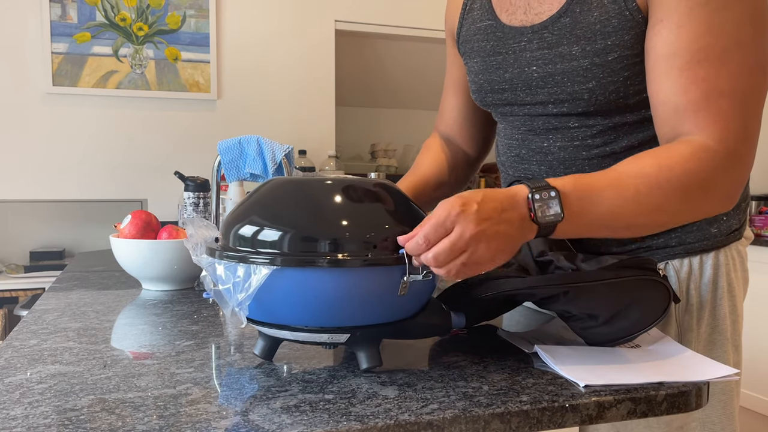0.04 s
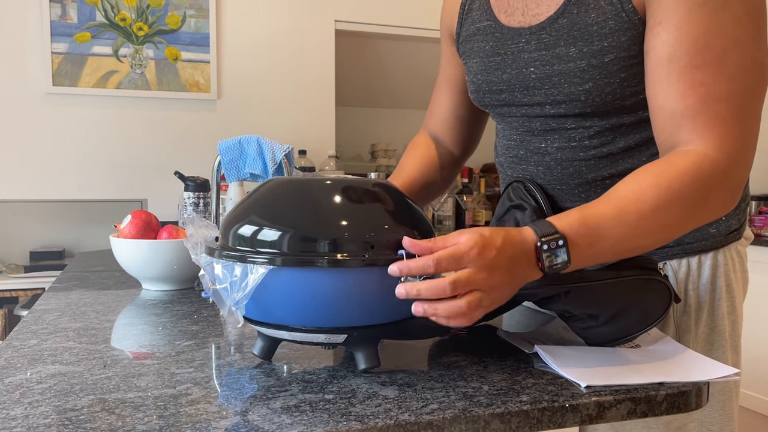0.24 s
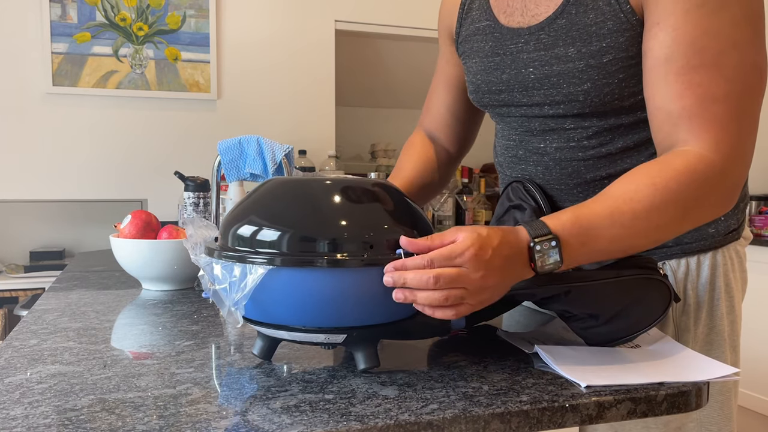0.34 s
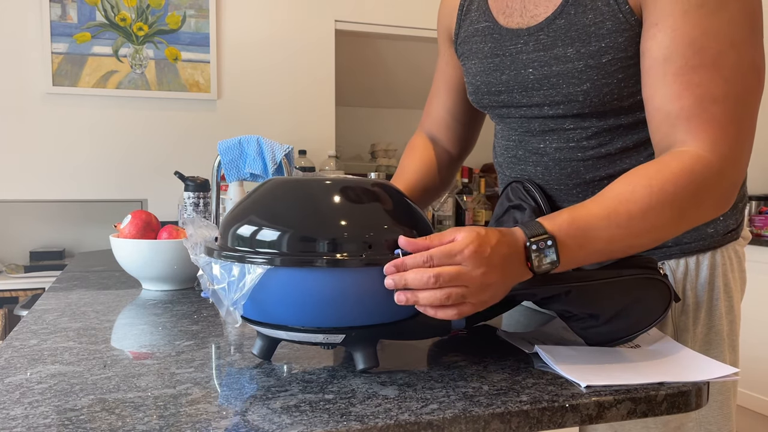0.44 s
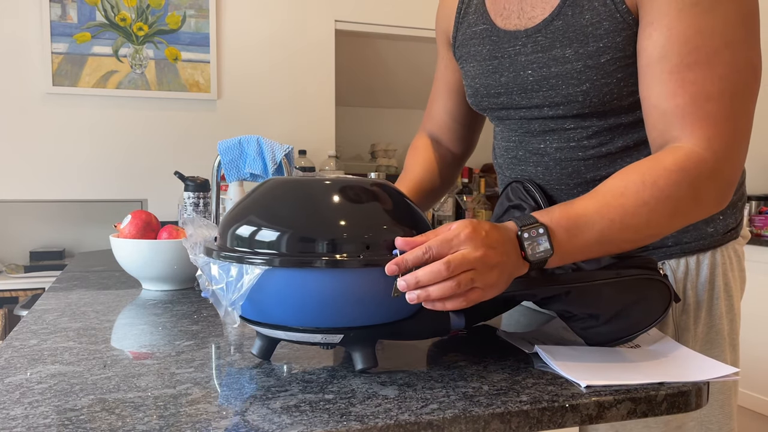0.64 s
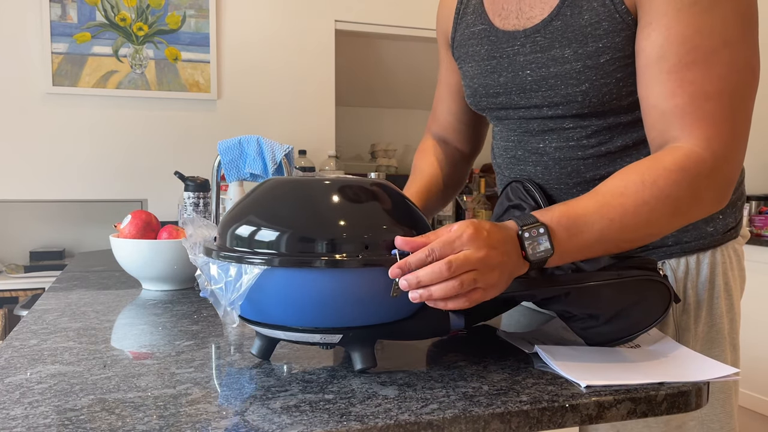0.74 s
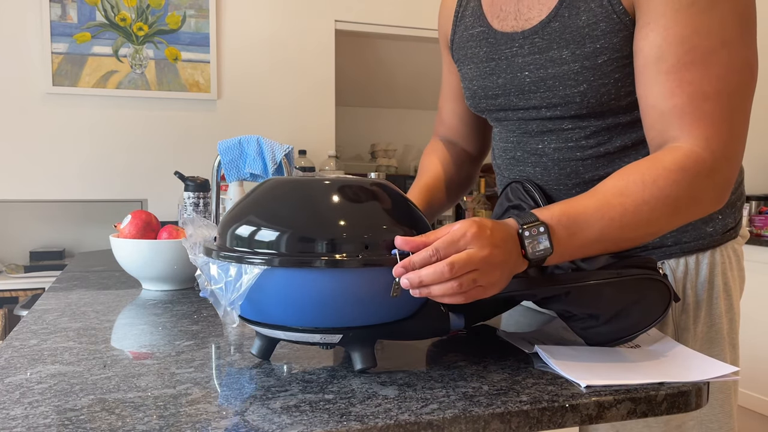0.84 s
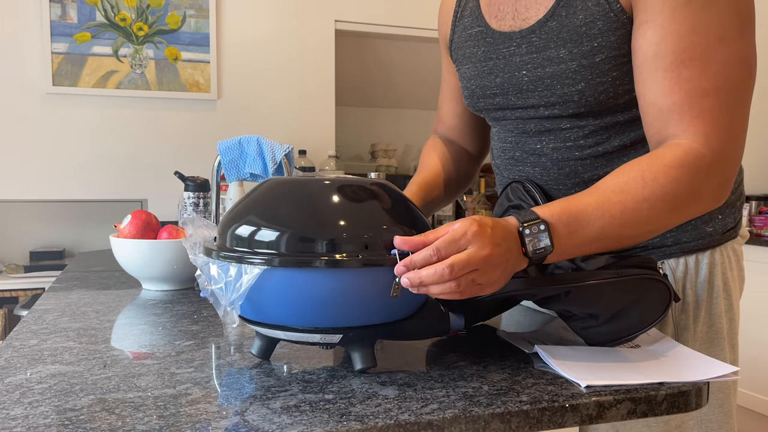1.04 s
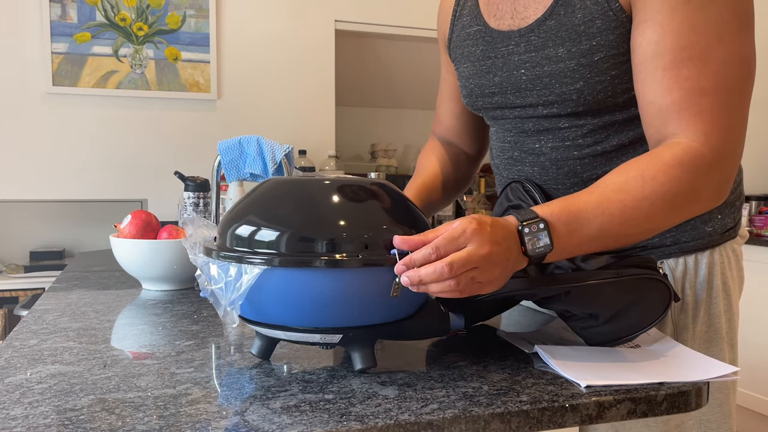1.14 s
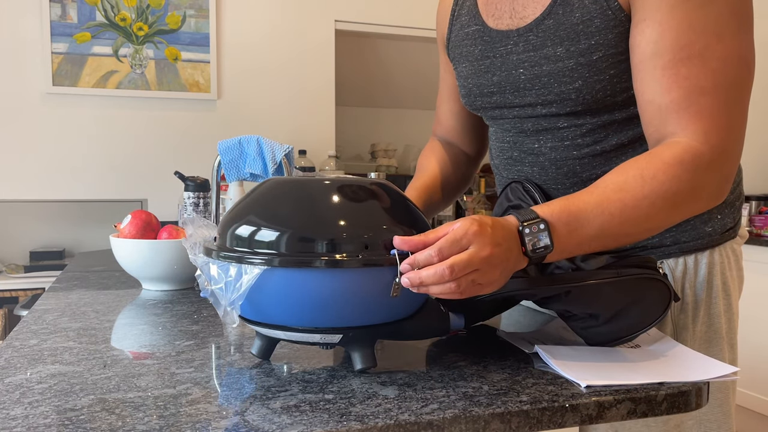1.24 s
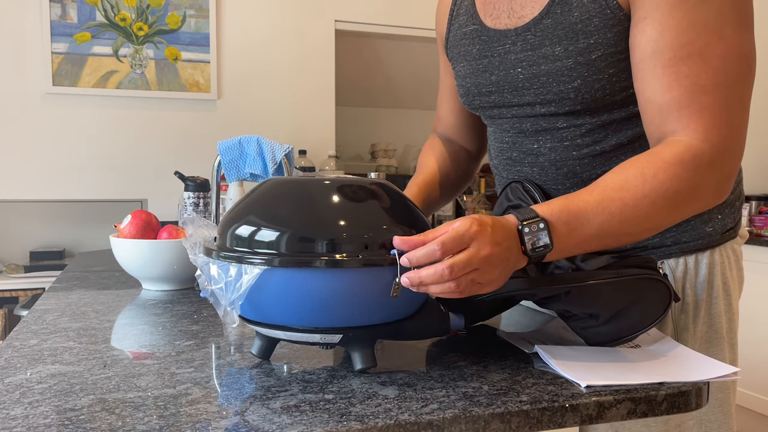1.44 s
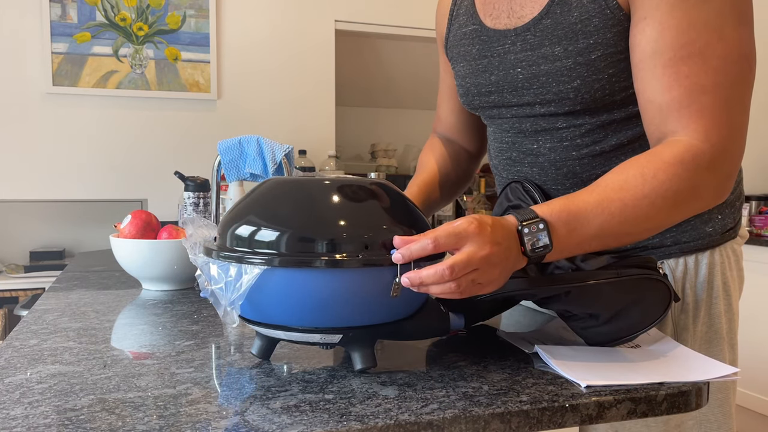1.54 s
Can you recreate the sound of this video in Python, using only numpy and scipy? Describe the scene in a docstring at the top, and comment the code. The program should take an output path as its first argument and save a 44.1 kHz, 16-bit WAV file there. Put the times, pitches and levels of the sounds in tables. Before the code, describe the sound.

A metal latch clacks and rattles on a small grill's lid in a kitchen.

```python
"""A hand works the metal latch on the domed lid of a small grill on a stone counter.
The grill bumps softly on its feet and the latch scrapes, then snaps over hard at 0.25 s.
From 0.8 s it is flipped and rattled twice more; faint ticks, scrapes and bumps close the scene.
Each contact rings the latch and the steel lid; a bare kitchen throws it back."""
import sys
import numpy as np
from scipy import signal
from scipy.fft import rfft, irfft
from scipy.io import wavfile
from scipy.ndimage import uniform_filter1d

SR = 44100
rng = np.random.default_rng(int(sys.argv[2]) if len(sys.argv) > 2 else 0)


def output_pcm(signal):
    """Save a mono or channel-first signal as 16-bit PCM at the path in sys.argv[1].

    Samples are clipped to [-1, 1] before scaling.
    """
    pcm = np.clip(np.atleast_2d(signal).T, -1, 1) * 32767
    wavfile.write(sys.argv[1], SR, np.round(pcm).astype(np.int16))


N = 70560
T = np.arange(N) / SR
HZ = np.fft.rfftfreq(2 * N, 1 / SR)


def amp(db):
    """Decibels to gain."""
    return 10 ** (np.asarray(db) / 20)


def unit(x):
    """Scale each row to unit energy."""
    return x / np.sqrt((x ** 2).sum(-1, keepdims=True) + 1e-20)


def decay(t, t60_s):
    """Exponential fall, 60 dB per t60_s."""
    return np.exp(-np.log(1000) * t / t60_s)


def curve(points, hz=HZ):
    """Interpolate (freq_hz, value) points on a log frequency axis."""
    freq_hz, value = np.transpose(points)
    return np.interp(np.log(hz + 1), np.log(freq_hz + 1), value)


def add(mix, start_s, sound):
    """Mix in a sound; start_s may be negative."""
    at = round(start_s * SR)
    sound = sound[:, max(-at, 0):]
    part = mix[:, max(at, 0):][:, :sound.shape[1]]
    part += sound[:, :part.shape[1]]


def convolve(a, b):
    """Convolve along time, cut to N samples."""
    return signal.fftconvolve(np.atleast_2d(a), np.atleast_2d(b), axes=1)[:, :N]


def colour(x, points, size=4096):
    """Minimum-phase filter from (freq_hz, gain_db) points."""
    log_gain = np.log(amp(curve(points, abs(np.fft.fftfreq(size, 1 / SR)))))
    response = np.exp(np.conj(signal.hilbert(log_gain)))
    return convolve(x, np.fft.ifft(response).real[:size // 2])


def noise(spectrum):
    """Steady coloured noise, unit RMS."""
    white = rfft(rng.standard_normal((2, 2 * N)))
    return np.sqrt(N) * unit(irfft(white * amp(curve(spectrum)))[:, :N])


# air and rumble spectra: freq_hz, relative_db
AIR_SPECTRUM = [(25, -31), (52, -16.5), (90, -7.5), (220, -16), (400, -18), (900, -12), (2500, -30),
                (9000, -38), (13000, -62)]
RUMBLE_SPECTRUM = [(20, -30), (36, -29), (52, 10.5), (70, 0), (110, -23), (300, -57), (1000, -88)]

def air(hiss_db=-56.5, rumble_db=-63.5, waver_db=3, waver_hz=6):
    """Faint kitchen hiss and a wavering low rumble."""
    slow_spectrum = rfft(rng.standard_normal(2 * N)) / (1 + (HZ / waver_hz) ** 4)
    waver = np.sqrt(N) * unit(irfft(slow_spectrum)[:N])
    hiss = amp(hiss_db) * noise(AIR_SPECTRUM)
    return hiss + amp(rumble_db + waver_db * waver) * noise(RUMBLE_SPECTRUM)


# kitchen decay: freq_hz, t60_s
KITCHEN_DECAY = [(150, 0.7), (400, 0.31), (1000, 0.57), (2700, 0.68), (5500, 0.62), (8500, 0.5644),
                 (12000, 0.37)]
# kitchen colour: freq_hz, gain_db
KITCHEN_COLOUR = [(150, 3.5), (400, 0), (900, 2), (1500, -0.5), (2400, 4), (5500, 6), (8500, 4.5),
                  (12000, 4.5), (14000, -16)]

def kitchen_tail(delay_s=0.0017, build_s=0.015):
    """Diffuse reflections build up, then die band by band."""
    hz, t, bands = signal.stft(rng.standard_normal((2, SR)), SR, nperseg=256)
    t60_s = curve(KITCHEN_DECAY, hz)[:, None]
    equal_energy = np.sqrt(2 * np.log(1000) / (t60_s * SR))
    bands = bands * amp(curve(KITCHEN_COLOUR, hz)[:, None]) * decay(t, t60_s) * equal_energy
    tail = signal.istft(bands, SR, nperseg=256)[1][:, :SR]
    return tail * (1 - np.exp(-np.maximum(T[:SR] - delay_s, 0) / build_s))


# knocks of the feet: start_s, level_db, pitch_hz
FOOT_BUMPS = [(0.0, -42, 232), (0.066, -28, 234), (0.118, -44, 223), (0.206, -31.5, 244),
              (0.2485, -14.5, 200), (0.399, -37.5, 254), (0.788, -43.5, 229), (1.425, -40, 225),
              (1.55, -38, 236)]

def foot_bumps(rise_s=0.009, room_db=-11):
    """The grill rocks on its feet with short low knocks."""
    out, t = np.zeros((2, N)), T[:SR // 8]
    rise = (t / rise_s) ** 2
    for start_s, level_db, pitch_hz in FOOT_BUMPS:
        knock = amp(level_db) * rise * np.exp(1 - rise) * np.sin(2 * np.pi * pitch_hz * t)
        add(out, start_s, np.array([knock, np.zeros_like(knock)]))  # shared row only
        add(out, start_s, amp(room_db) * convolve(knock, kitchen_tail()))
    return out


def chatter(envelope, size=4096, smooth_bins=50):
    """Tiny impacts as a noise burst with a flattened spectrum."""
    spectrum = rfft(rng.standard_normal((2, size)) * envelope[:size], 2 * size)
    spectrum /= np.sqrt(uniform_filter1d(abs(spectrum) ** 2, smooth_bins) + 1e-12)
    return unit(irfft(spectrum)[:, :size])


def metal_ring(modes):
    """Damped modes; random phases stand for a new strike spot."""
    t = T[:SR]
    return sum(amp(db) * unit(decay(t, t60_s) * np.sin(2 * np.pi * (hz * t + rng.random((2, 1)))))
               for hz, db, t60_s in modes)


# steel lid and latch modes: pitch_hz, level_db, t60_s
LID_MODES = [(338, -19, .55), (369, -16, .35), (392, -16, .45), (603, -18, .3), (764, -20, .45),
             (947, -25, .5), (1117, -18, .45), (2435, -11, .65), (2478, -13, .55), (3303, -10, .55),
             (4180, -15, .45), (5467, -19, .75), (6191, -18, .5), (8016, -21, .55)]
LATCH_MODES = [(790, -20, .4), (848, -19, .45), (1428, -18, .3), (1885, -16, .6), (2345, -17, .5),
               (2812, -15, .35), (2900, -16, .25), (3790, -18, .35), (5572, -18, .6), (7270, -19, .5),
               (7747, -17, .5), (8500, -19, .35), (8745, -20, .45), (9405, -17, .55)]

def contact(envelope, room_db, lid_db, latch_db, apart_db=-6.5):
    """Metal meets metal: room tail, lid and latch ring, direct chatter. Rows: shared, apart."""
    sound = amp(room_db) * kitchen_tail()
    sound += amp(lid_db) * metal_ring(LID_MODES)
    sound += amp(latch_db) * metal_ring(LATCH_MODES)
    add(sound, 0, chatter(envelope) * amp([[0], [apart_db]]))
    return sound


# latch slides: start_s, length_s, level_db, bright_db
LATCH_SCRAPES = [(0.054, 0.044, -35, 1), (0.233, .014, -29, 7), (0.815, 0.021, -29, 0.5),
                 (1.21, 0.028, -32.5, 13), (1.369, .03, -37, -6), (1.502, 0.032, -30.5, -4.5)]

def latch_scrapes(slips_per_s=900, slip_s=0.001):
    """The latch slides on its catch in swelling runs of small slips."""
    out = np.zeros((2, N))
    for start_s, length_s, level_db, bright_db in LATCH_SCRAPES:
        slips = rng.choice([-1, 1], N) * (rng.random(N) < slips_per_s / SR)
        swell = (T < length_s) * np.sqrt(T / length_s)
        one_slip = contact(np.exp(-T / slip_s), room_db=-3, lid_db=-4, latch_db=0)
        scrape = convolve(unit(slips * swell), one_slip)
        add(out, start_s, amp(level_db) * colour(scrape, [(400, 7.5), (850, 4), (1800, bright_db)]))
    return out


# thud, body, clank, middle and treble bands: centre_hz
CLACK_BANDS_HZ = [300, 800, 1500, 3700, 8500]
# latch hits: start_s, level_db, thud_db, body_db, clank_db, middle_db, treble_db,
# chatter_t60_s, room_db, lid_db, latch_db (band, room and ring gains relative to level_db)
LATCH_CLACKS = [(-0.04, -25, -2.5, -1, 5.5, -0.5, 1, .03, 2, -7.5, -6),
                (0.2030, -35, -1.5, 10.5, 6, -6, 2.5, 0.026, 3, 3.5, -2.5),
                (0.2258, -21.5, -5, -2, 1, -5.5, -4, 0.058, 11, -3, -15),
                (0.2487, 4, -1.5, 4.5, 3.5, 5.5, 7.5, 0.057, 0.5, -1.5, -34),
                (0.2597, -7, -18, -15, -19.5, 6, -13, 0.018, 9, 8.5, -9),
                (0.7765, -27, -8, 1, 10, 8.5, -17, 0.065, -4, -28, -4),
                (0.7835, -25.5, -11.5, 1.5, 5.5, 4, 2, 0.048, -1, -2, 1.5),
                (0.8531, -4, -8, -18, -11, -5.5, 7.5, 0.1, -9.5, 0, 3),
                (0.856, -10.5, 6.5, 2, 14, 9, -3, 0.026, -1.5, -11, -5),
                (0.8650, -20.5, 5, 9, -18, -1, 18, 0.027, 0, 1.5, -7),
                (0.8978, -2, 0, -7.5, -6, -3.5, 6, 0.097, -2, -9.5, 0.5),
                (0.9930, -27.5, 1, 1, 5, -6, 4.5, 0.035, 10, 6, 7.5),
                (1.0306, -16.5, -8, -4.5, 2, 2.5, -1, .04, -10, -7.5, -0.5),
                (1.084, -44, -8, -12, 11, -4, 2.5, 0.019, 17, -10, -6),
                (1.1130, -25, -3, -2.5, 6, 11, -18, 0.012, -22, -23, -2),
                (1.1193, -19.5, 6.5, 6.5, 9, 5.5, -1, 0.064, -2.5, -12, -7.5),
                (1.159, -29, -6, 5.5, 5, -2, 1, 0.014, -24, -27, 2),
                (1.241, -13.5, 1, -1.5, 7.5, 13, 9.5, 0.097, -5, -8, -6.5),
                (1.2650, -21.5, 7, 16, -13, -12, 6, 0.015, -1, -7.5, -10),
                (1.4607, -22.5, -2, -15, -4, 0.5, -9, .025, -19, -15, 2.5),
                (1.5345, -28.5, 7, 8, -1, 0, -8, 0.022, -3, -9, -4.5)]

def latch_clacks(attack_s=0.00065):
    """The latch hits its catch and chatters briefly."""
    out = np.zeros((2, N))
    for start_s, level_db, *bands_db, chatter_t60_s, room_db, lid_db, latch_db in LATCH_CLACKS:
        envelope = (1 - np.exp(-T / attack_s)) * decay(T, chatter_t60_s)
        clack = contact(envelope, room_db, lid_db, latch_db)
        add(out, start_s, amp(level_db) * colour(clack, list(zip(CLACK_BANDS_HZ, bands_db))))
    return out


# likeness of the ports: freq_hz, coherence
PORT_COHERENCE = [(60, .94), (150, .93), (350, .72), (700, .45), (1500, .4), (3000, .45), (5300, .35),
                  (6900, .5), (7600, .8), (8600, .93), (12000, .92)]
# port phase: freq_hz, left_lead_rad
PORT_PHASE = [(60, 0), (350, 0), (1700, -.2), (2800, 1), (4100, .4), (5200, .9), (6400, .1), (7600, 1.1),
              (8800, -.3), (10000, -2.8), (11000, -4.4), (12000, -6.2)]
# port balance: freq_hz, left_minus_right_db
PORT_BALANCE = [(60, 0.3), (700, 2), (2300, 1.5), (4200, 4.5), (5500, 5), (6400, 2), (7100, 6.5), (8300, 0),
                (12000, 1)]

def microphone_ports(x):
    """Shared and apart rows to left and right at two close ports."""
    shared, apart = rfft(x, 2 * N)
    coherence = curve(PORT_COHERENCE)
    shared *= np.sqrt((1 + coherence) / 2)
    apart *= np.sqrt((1 - coherence) / 2)
    lean = amp(curve(PORT_BALANCE) / 2) * np.exp(0.5j * curve(PORT_PHASE))
    return irfft(np.array([(shared + apart) * lean, (shared - apart) / lean]))[:, :N]


def gain_control(x, threshold_db=-22.5, squeeze=0.34, release_db_per_s=83, size=260):
    """Duck by a share of the held excess level; recover during the clack's tail."""
    level_db = 10 * np.log10(abs(uniform_filter1d((x ** 2).mean(0), size)) + 1e-12)
    fall_db = T * release_db_per_s
    held_db = np.maximum.accumulate(level_db + fall_db) - fall_db
    excess_db = np.maximum(held_db - threshold_db, 0)
    return x * amp(-squeeze * uniform_filter1d(excess_db, size))


# colour of all latch contacts: freq_hz, gain_db
CONTACT_COLOUR = [(40, -7.5), (110, -16.5), (190, 2), (260, 7), (370, 7.5), (480, 7), (610, 10), (690, 8),
                  (800, 13), (940, 9.5), (1050, 6), (1170, 7.5), (1500, 4.5), (1900, -3), (2250, -4),
                  (2450, -2.5), (2650, -2.5), (2900, -0.5), (3600, -7.5), (4400, -4), (5100, -3),
                  (6500, -2), (8800, -1.5), (9900, 2), (11500, 3), (12300, -8.5), (13200, -30),
                  (16000, -33)]

def scene(latch_gain_db=15):
    """Latch, grill and kitchen at the microphone."""
    latch = amp(latch_gain_db) * colour(latch_clacks() + latch_scrapes(), CONTACT_COLOUR)
    return microphone_ports(latch + foot_bumps() + air())


def record(dry, notch_hz=10230, notch_width_hz=220, notch_db=-32, cutoff_hz=16200):
    """Gain control, narrow treble notch, soft overload, band limit."""
    notch = amp(notch_db * np.exp(-((HZ - notch_hz) / notch_width_hz) ** 2))
    notched = irfft(rfft(gain_control(dry), 2 * N) * notch)[:, :N]
    clipped = notched / (1 + notched ** 8) ** (1 / 8)
    lowpass = signal.firwin(511, cutoff_hz, window=("kaiser", 9), fs=SR)
    return signal.oaconvolve(clipped, lowpass[None], "same")


dry = scene()
out = record(dry)
output_pcm(out)
```